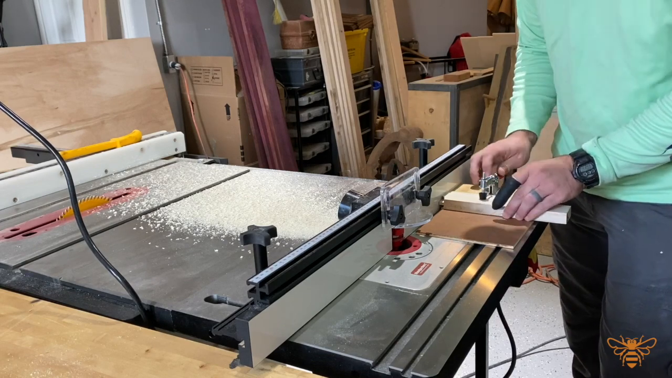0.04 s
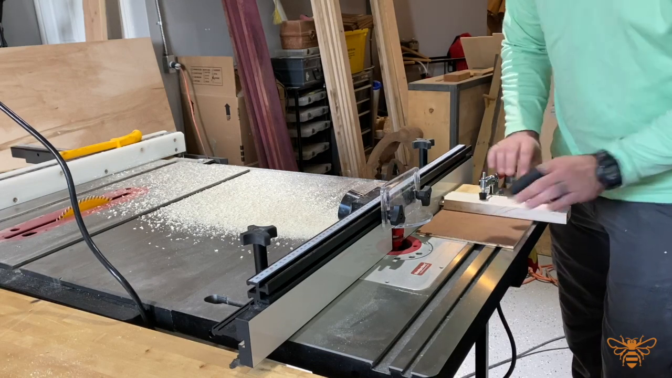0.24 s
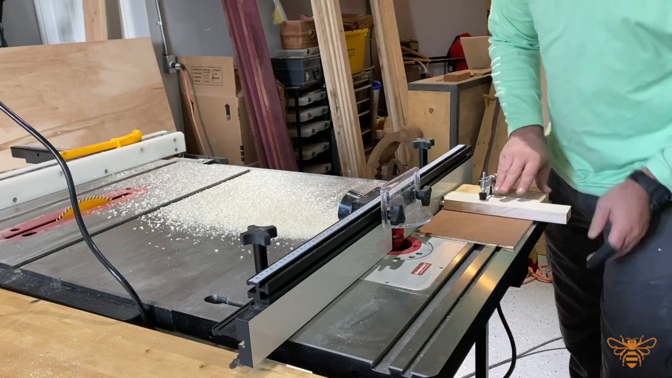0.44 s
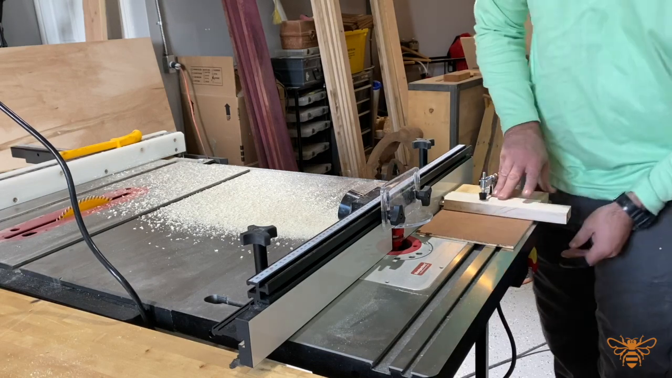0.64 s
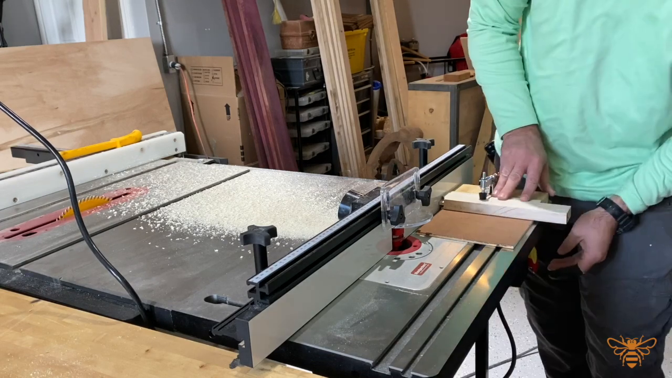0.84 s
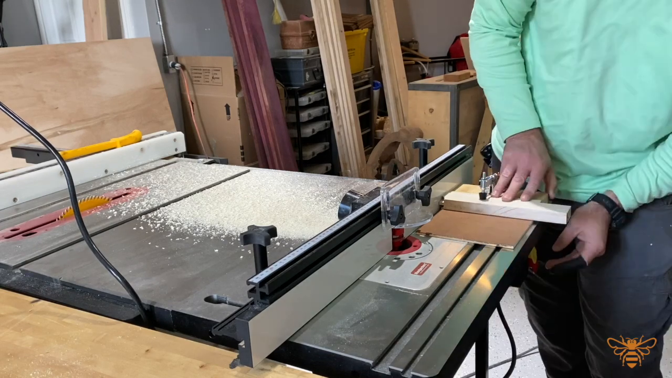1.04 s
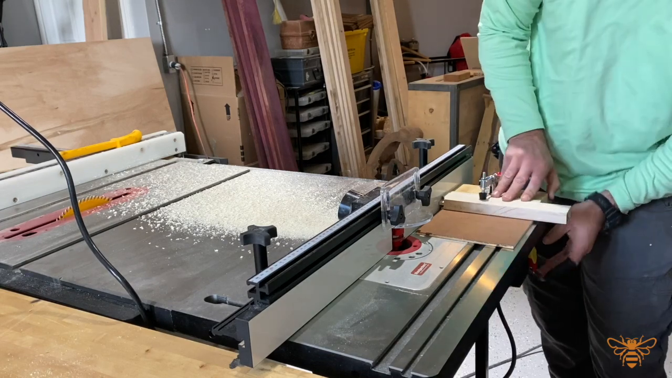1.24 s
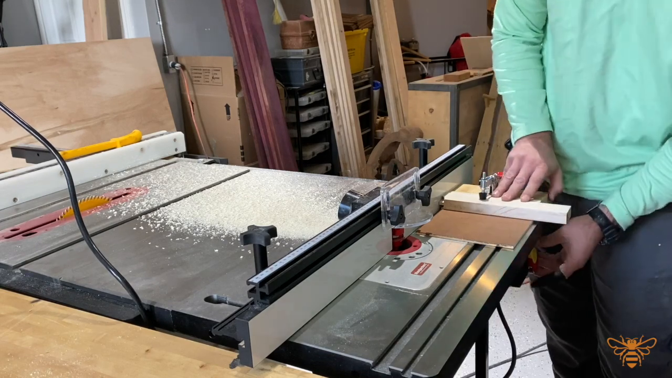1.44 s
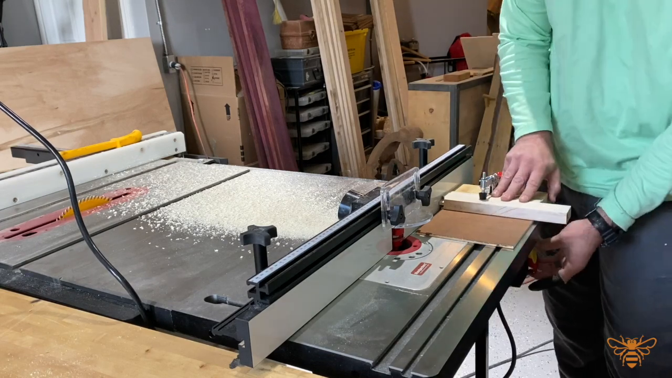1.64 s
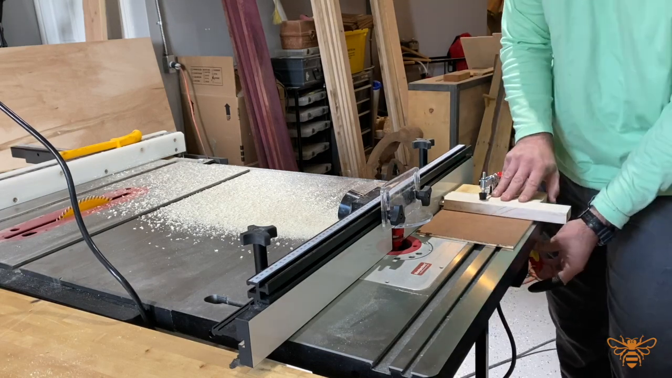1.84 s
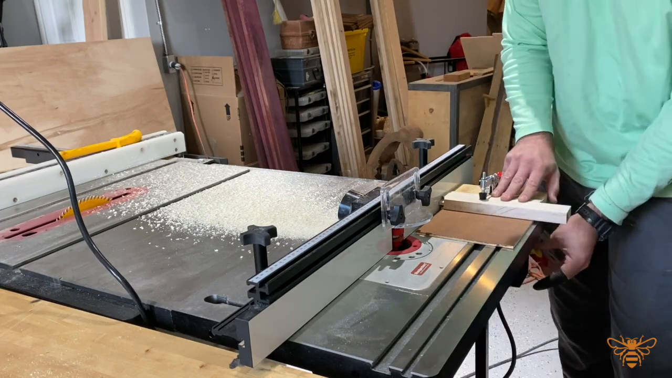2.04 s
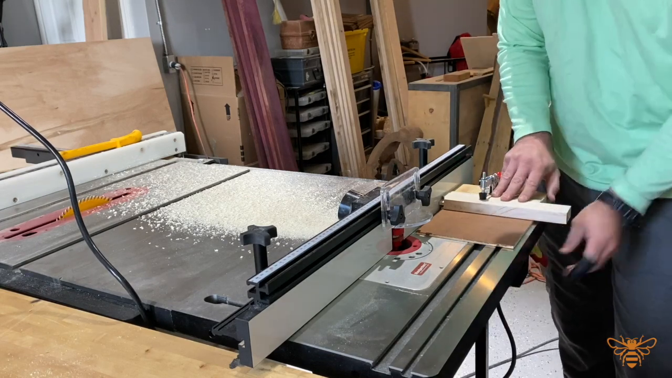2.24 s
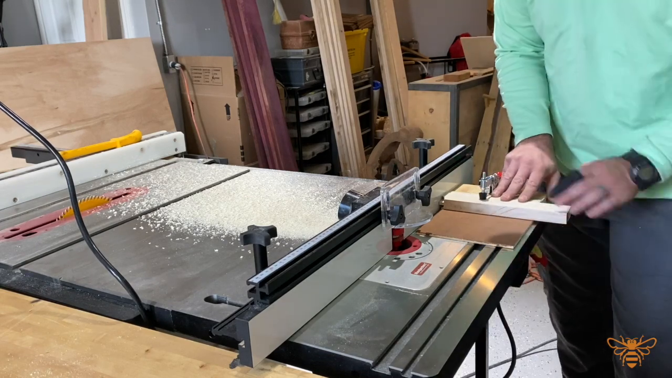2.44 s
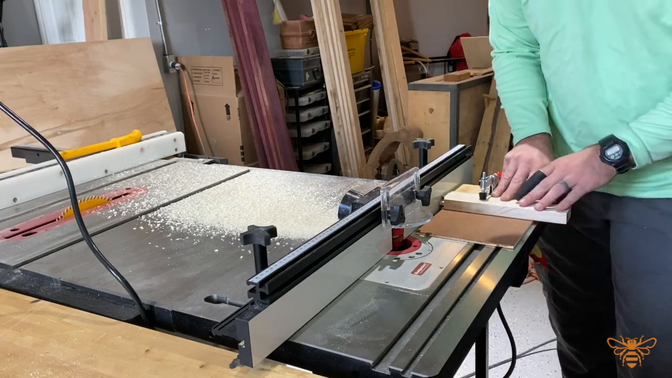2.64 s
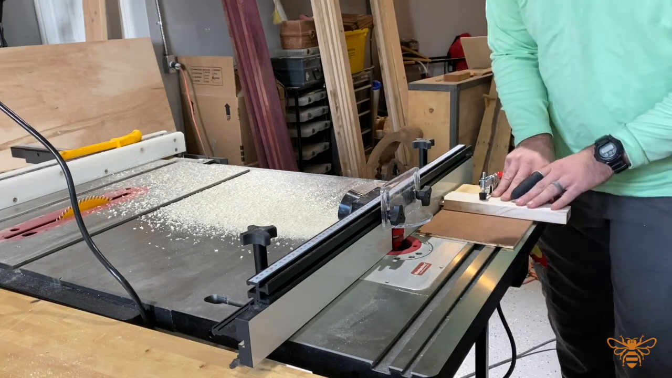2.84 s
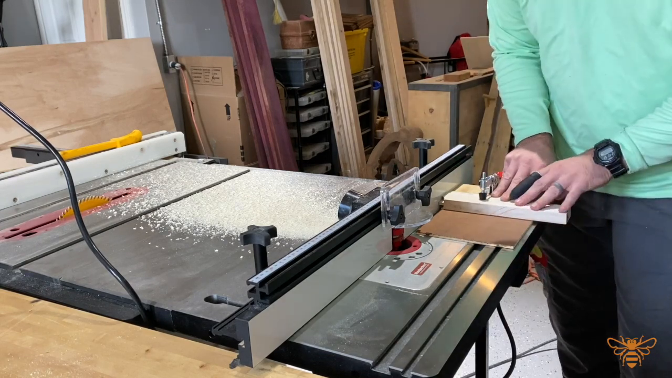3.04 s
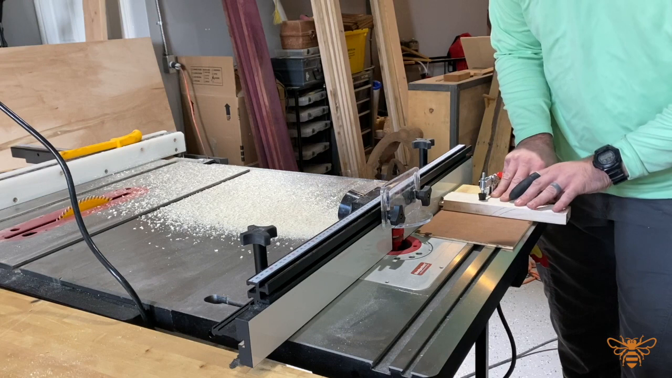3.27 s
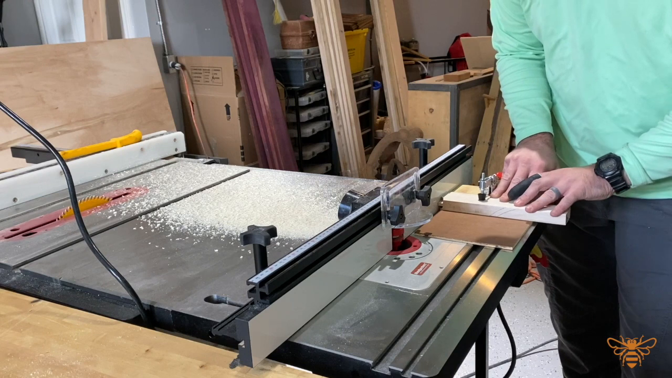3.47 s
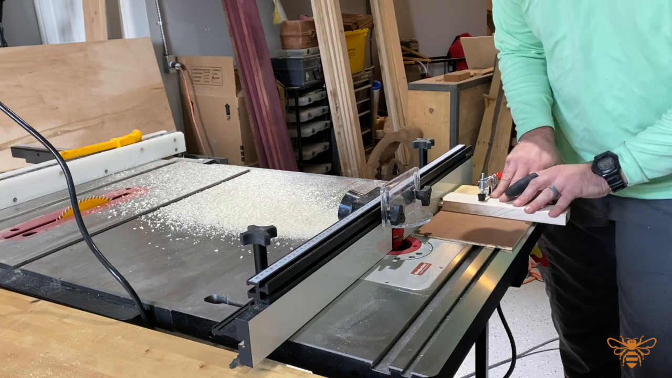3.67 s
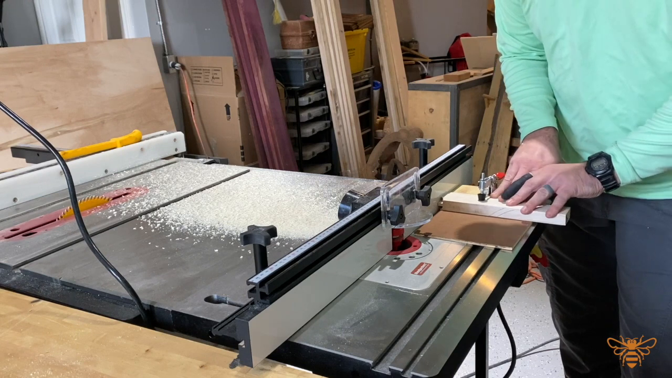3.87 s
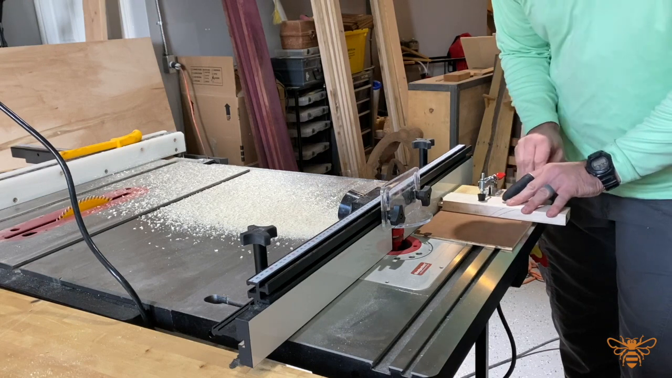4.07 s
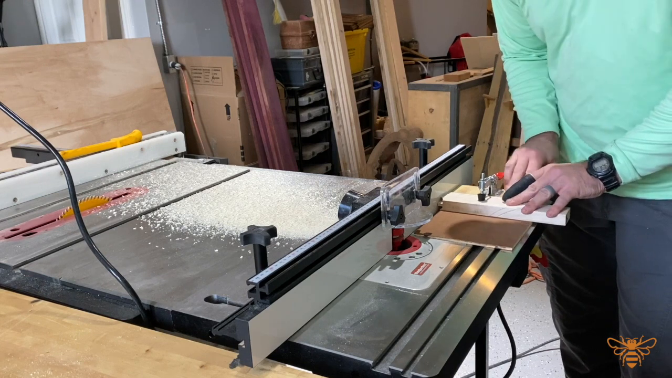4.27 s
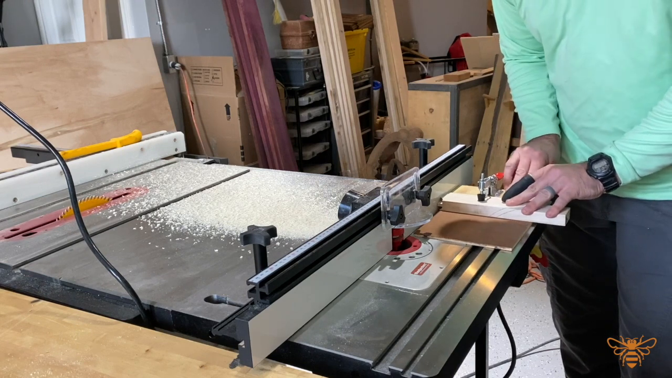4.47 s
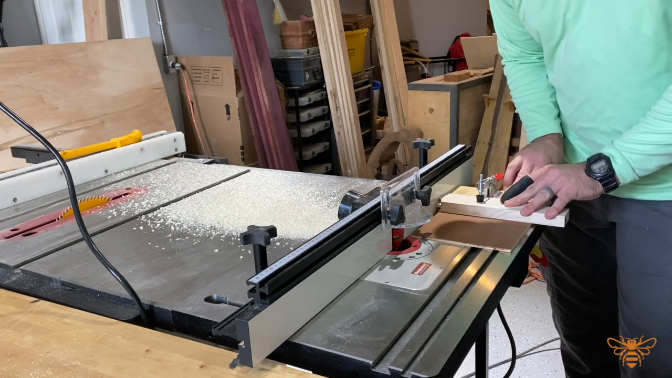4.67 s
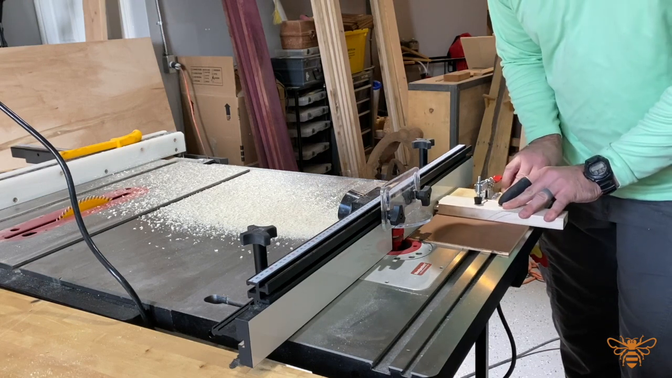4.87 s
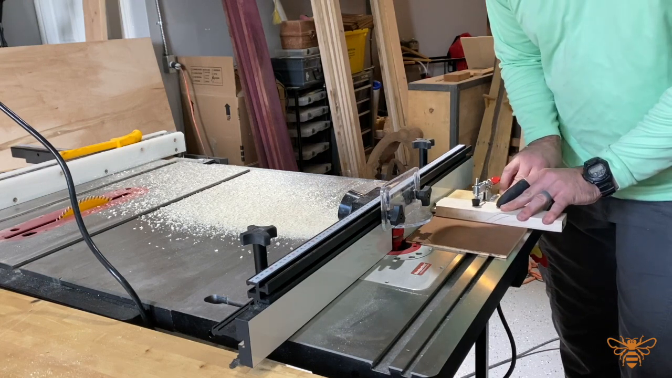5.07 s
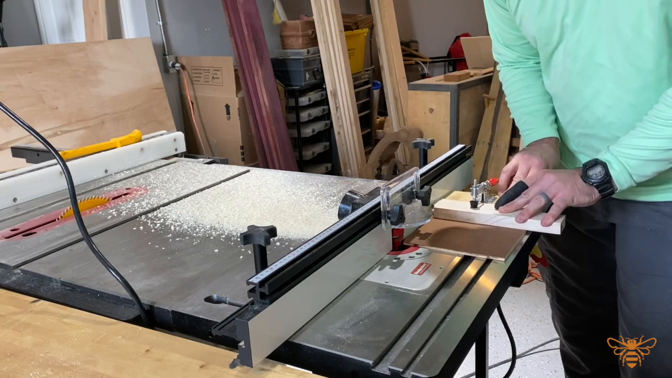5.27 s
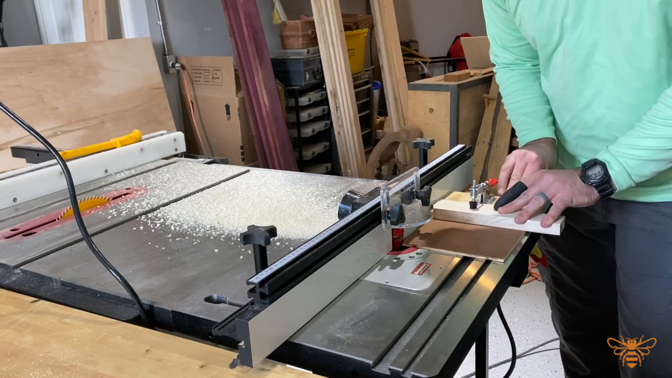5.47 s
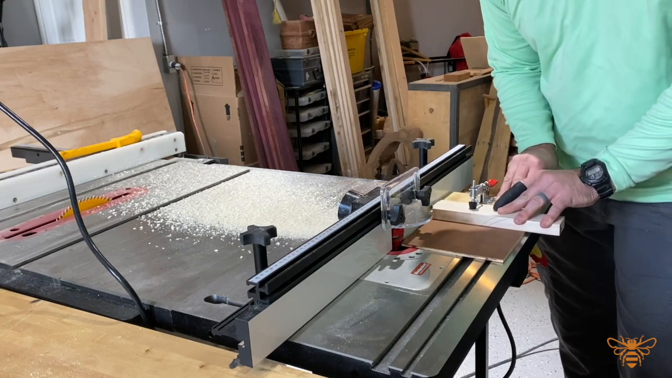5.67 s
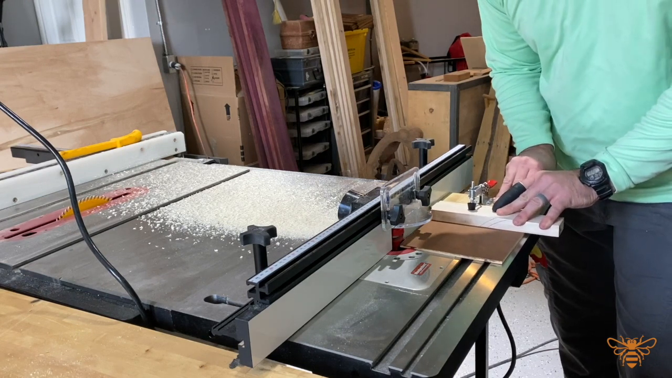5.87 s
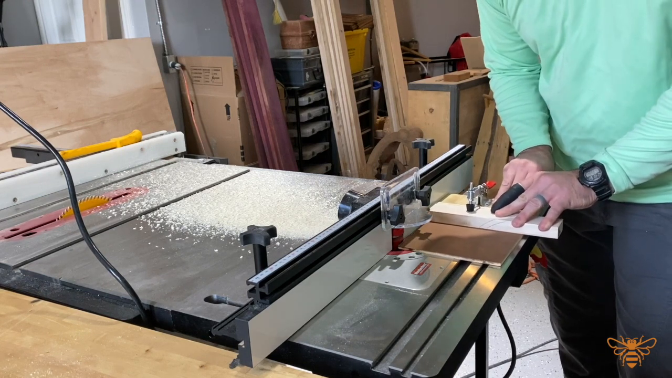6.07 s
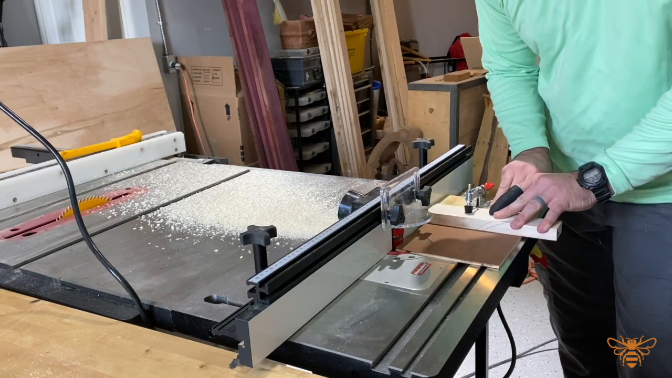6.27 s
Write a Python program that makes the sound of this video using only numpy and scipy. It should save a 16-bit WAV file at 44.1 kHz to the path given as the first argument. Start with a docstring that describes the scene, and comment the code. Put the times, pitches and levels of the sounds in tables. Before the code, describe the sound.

A quiet workshop hums low with a distant fan for about two seconds. A hard plastic switch cracks, with a brief bright whistling chirp, and a table-mounted router climbs rapidly in pitch to a piercing, many-toned whine with roaring, hissing air. It holds steady to the end. Close stereo camera microphone, lightly reverberant room; no cutting is heard.

```python
"""Workshop: a table-mounted router is switched on near a camera and spins up to a steady whine.
The whine is sines on the shaft orders; fan and brush noise grows with speed, the switch cracks and rings,
and the commutator bars whistle at the start. Mains hum, rumble and a far fan fill the room before it;
the camera's slow gain control turns them down under the motor."""
import sys
import numpy as np
from scipy import signal
from scipy.fft import rfft, irfft, next_fast_len
from scipy.io import wavfile
from scipy.ndimage import uniform_filter1d, map_coordinates

SR = 44100
rng = np.random.default_rng(int(sys.argv[2]) if len(sys.argv) > 2 else 0)


def persist_wave(psi):
    """Save psi, clipped to +-1, as 16-bit WAV."""
    counts = np.round(np.clip(psi, -1, 1) * 32767).astype(np.int16)
    wavfile.write(sys.argv[1], SR, np.atleast_2d(counts).T)


N = 278271

# lean_db is left minus right; likeness is left-right correlation; order is a multiple of shaft speed
# strong shaft orders, base: order, level_db at 0.4, 0.6 and 1.0 of full speed (3 columns), lean_db
STRONG_ORDERS = [(1.0, -49, -31.5, -27.5, 1.5), (2.0, -60, -41, -29, -4.5), (3.0, -47.5, -36.5, -19.5, 0.5),
                 (4.0, -52, -26, -25.5, -2.2)]
# usual phase lead of the left ear, one per strong order: lead_rad
STRONG_LEAD_RAD = [0.72, 0.66, 0.58, 0.16]
# clear upper orders, base: order, level_db at 0.4, 0.6 and 1.0 of full speed (3 columns), lean_db
CLEAR_ORDERS = [(5.0, -48, -39, -35.5, 5.5), (6.0, -45, -43.5, -27, -1), (7.0, -78, -40.5, -39.5, -0.5),
                (8.0, -81, -31.5, -35, 2), (10.0, -68, -43, -40.5, 1.5), (12.0, -52, -46.5, -38.5, 6.5),
                (17.0, -66, -60, -33.5, 0)]
# faint orders, base: order, level_db at 0.55, 0.9 and 0.99 of full speed (3 columns)
FAINT_ORDERS = [(9, -39, -43, -45), (11, -56, -37, -43), (13, -54, -42, -56), (14, -50, -45, -41.5),
                (16, -56, -48, -42.5), (18, -47, -50, -43)]
# resonances and standing waves that the strong and clear orders slide over: pitch_hz, spread_hz, gain_db, lean_db
STANDING_WAVES = [(289, 8.7, -12, 4), (320, 4, -4, -6), (362, 4.4, 3.5, 7), (378, 2.7, -5, -13),
                  (408.5, 1.7, -7, 15), (419, 3.7, 4, 10), (417, 0.53, -2, -7), (435.6, 3.6, -5, 11),
                  (433, 1.4, -5, 8), (442.9, 3.93, 11, -2), (447.6, 2.2, -1.5, 13.5), (548, 12.5, 15, 3),
                  (620, 11, -6, -1), (713, 52, 9, 1), (767, 18, 2, 0), (790, 9, -2, 2),
                  (857, 10.1, 12, 3.5), (891.5, 3.3, 7, 5.5), (1040, 13, -7, 0), (1052, 87, -9, 2),
                  (1223, 6.1, 4.5, 0), (1262, 9.3, 4, 2), (1323, 0.74, -10, -1), (1335, 13.3, -7, -4),
                  (1550, 66, 4.5, -1.5), (1710, 57, 8.5, -2), (1756, 2, 4, 0), (1766, 3.8, 4, 1),
                  (1778.8, 1.07, -14, -16), (1788.1, 1.1, -9.5, 12), (1867, 21, 8, -4), (2083, 24, -10, -2),
                  (2480, 18, -5, 0), (2230, 3.2, -4.5, 2), (2232.1, 6.1, 12, -10.5),
                  (2303, 49.5, -10.5, -1), (2636, 68, -5, 3.5), (2677, 4.4, 4, -3.5),
                  (2684.4, 0.49, -16, -2), (3122, 1.1, -2, -5), (3250, 51, -3, -2), (3574.8, 3.3, 5.5, -2),
                  (4244, 110, 9, -3), (4450, 47, 6.5, 1), (5355, 2.4, 8, -4), (5367, 1.3, 2.5, 5),
                  (6280, 150, 11, -2), (6810, 73, 7, -5), (7611.9, 32, -6, 5)]
# whine surges and dips as it climbs: centre_s, spread_s, gain_db
SURGES = [(2.195, 0.031, 5.5), (2.33, 0.0081, 4), (2.45, 0.043, -2), (2.975, 0.0099, 2)]
# passing swells and fades of single orders: order, centre_s, spread_s, gain_db
SWELLS = [(1, 2.205, 0.016, -3), (1, 2.29, .008, -10), (1, 2.375, .01, -8), (1, 2.32, .015, -1),
          (1, 2.43, 0.017, 3), (1, 2.49, .012, -10), (1, 2.68, 0.015, -4), (1, 2.98, 0.029, -1.5),
          (1, 3.275, .026, -12), (1, 3.755, 0.024, -13), (1, 3.5, .04, 2.5), (2, 2.19, .012, -8),
          (2, 2.34, .01, 3), (2, 2.255, .01, 2.5), (2, 2.28, .012, -5), (2, 3.19, 0.018, -6),
          (2, 4.22, 0.22, -2), (2, 4.17, .03, -12), (2, 2.52, .1, -2), (3, 2.21, .01, 5),
          (3, 2.235, 0.011, -11), (3, 2.27, .012, -2.5), (3, 2.465, .025, -8), (3, 2.57, .04, -8),
          (3, 2.93, 0.07, 2), (3, 3.22, 0.11, -3), (3, 4.27, 0.048, -8.5), (4, 2.235, .015, 6.5),
          (4, 2.29, .012, -11), (4, 3.94, 0.06, -8.5), (4, 4.52, .06, 4), (4, 6.26, 0.23, 2),
          (5, 2.235, .01, -4), (5, 2.33, .01, -2), (5, 2.44, 0.019, -13), (5, 4.06, .025, -14),
          (5, 4.22, .04, -12), (5, 5.0, 0.29, 1.5), (5, 2.76, .04, -9), (5, 5.75, .4, -1),
          (6, 2.13, 0.018, 2), (6, 2.21, 0.027, -8), (6, 2.27, .01, 3), (6, 2.31, 0.01, 7),
          (6, 2.41, .012, 3), (6, 2.485, 0.018, 12), (6, 3.77, 0.021, -12), (6, 3.33, 0.04, -10),
          (6, 3.9, 0.073, 3.5), (6, 3.62, 0.024, -12), (6, 5.05, 0.22, -0.5), (6, 4.19, .05, -10),
          (6, 5.6, .15, -10), (7, 2.25, .025, 9.5), (7, 2.31, .01, 8), (7, 2.35, .012, -12),
          (7, 2.75, .2, -4), (7, 3.94, 0.28, 4.5), (7, 4.85, .15, 7), (7, 5.26, 0.14, -19),
          (8, 2.23, 0.017, -8), (8, 2.2, .02, 3), (8, 3.07, 0.071, -7), (8, 3.58, 0.12, -7),
          (8, 2.6, .08, 4), (8, 3.97, 0.023, -14), (8, 4.47, 0.07, -10), (9, 2.85, 0.18, -10),
          (9, 4.1, 0.25, -8), (10, 2.21, .02, -5), (10, 2.29, .015, 5), (10, 3.3, 0.044, -4),
          (10, 3.75, 0.1, -6), (10, 4.03, 0.12, 4), (10, 6.35, .25, -5), (11, 2.92, .15, -6),
          (11, 3.95, .15, -11), (11, 4.7, .3, -7), (11, 5.85, .35, 5.5), (12, 3.8, 0.14, -5),
          (12, 4.28, .04, -12), (12, 4.85, .1, 2.5), (12, 5.1, .08, -12), (12, 6.1, .2, -8),
          (13, 4.6, .4, 7), (14, 4.7, .15, 6.5), (14, 5.6, 0.21, -9), (17, 3.87, 0.16, -3.5),
          (17, 4.95, .25, -5)]
# motor air, rows roar and hiss, base: full_speed_db, growth_db per doubling of speed,
# first_pull_cut_db (negative raises)
AIR = [(-21.5, 10, 5), (-21.5, 18.5, -8)]
# roar spectrum: pitch_hz, relative_db
ROAR_SHAPE = [(110, -12.5), (180, -14), (280, -16), (450, -12), (700, -5), (780, -4), (850, 0.5), (950, -5),
              (1200, -8), (1600, -4.5), (2200, -8), (3500, -34), (6000, -19.5)]
# hiss spectrum: pitch_hz, relative_db
HISS_SHAPE = [(1200, -70), (2500, -3), (3400, -6), (4400, -1.5), (5500, -5), (6500, -5.5), (8000, -8.5),
              (10000, -11), (11500, -17), (13000, -18.5), (15000, -17.5), (17500, -47)]
# standing waves that colour the roar: pitch_hz, gain_db
ROAR_BOOMS = [(566, 6), (632, 4), (675, 4), (706, 8), (810, -6), (833, 7), (920, 7), (945, 5), (988, 5),
              (1070, 4), (1221, 8), (1398, 3), (1600, 4), (1642, 6), (1690, -4)]
# bursts of noise as the motor starts: start_s, roar_db, hiss_db, t60_s
NOISE_BURSTS = [(2.0, -42, -36, 0.6), (2.12, -35, -30.5, 0.45)]
# commutator whistle ahead of the housing: time_s, peak_db
WHISTLE = [(2.042, -45), (2.0465, -15.5), (2.05, -22), (2.055, -33), (2.064, -34), (2.069, -22),
           (2.073, -33), (2.09, -31), (2.098, -33), (2.108, -38), (2.125, -29), (2.15, -48)]
# motor housing resonances: pitch_hz, width_hz, gain_db
HOUSING = [(2274, 38, 0), (2390, 160, -6.5), (3100, 190, -3), (4000, 150, -5), (4750, 40, 0)]
# switch contacts: start_s, relative_db, lean_db, ring_relative_db
CLICKS = [(1.997, -7, -1, 1.5), (2.0044, -42, -16, -5), (2.0462, -36, 5, 18), (2.1174, -32, -3, -8),
          (2.1225, -24, 5, -4)]
# plastic switch housing modes: pitch_hz, relative_db, t60_s
SWITCH_MODES = [(545, -10.5, .06), (1300, -12, 0.05), (1750, 2.5, 0.0095), (2260, 0.5, 0.014),
                (2900, 3.5, 0.0092), (5840, -6, 0.016), (7540, 0, 0.0084)]
# room decay: pitch_hz, t60_s
SHOP_DECAY = [(300, 0.99), (3000, 0.56), (12000, 0.016)]
# mains and other hum tones, base: pitch_hz, rms_db, unsteadiness_db
HUM = [(119.9, -41, .35), (359.7, -67, 1.5), (54.5, -52.5, 1.1), (60, -61, 1.5)]
# far fan blade tones, base: multiple of BLADE_HZ, rms_db
BLADES = [(1, -64), (2, -62), (3, -64), (5, -68), (6, -67), (8, -73), (9, -75), (10, -78), (11, -73),
          (13, -80), (14, -79)]
# rumble spectrum: pitch_hz, relative_db
RUMBLE_SHAPE = [(28, -17), (42, -10), (58, -5), (75, 4), (95, 0), (130, -4), (170, -3.5), (250, 0),
                (320, -9.5)]
# far fan noise spectrum: pitch_hz, relative_db
FAN_SHAPE = [(200, -29), (350, -2), (700, -7.5), (1000, -12), (1400, -12), (2400, -17), (5000, -19),
             (6500, -24.5), (9500, -30), (12500, -43), (14000, -42), (15000, -70)]
# motor noise: pitch_hz, likeness
NEAR_LIKENESS = [(200, 0.96), (1000, 0.4), (3000, 0.31), (6000, 0.25), (8000, 0.72), (10000, .9)]
# background noise: pitch_hz, likeness
FAR_LIKENESS = [(130, 0.94), (290, 0.3), (640, 0.12), (1400, .1), (7000, 0.13), (9500, .9)]

FULL_HZ, START_S = 447.7, 1.9627  # full shaft speed in turns/s
QUICK_S, SLOW_S, QUICK_SHARE = .1393, .5656, .4753  # time constants of the approach
PULL_S, PULL_HZ_PER_S = 1.98, 1480  # first pull limits the early speed
CATCH_S, CATCH_RISE_S = 2.086, 0.02  # motor catches; roar rises and hiss drops to their speed-set levels
LATE_S, LATE_FALL_DB_PER_S = 4, 0.75  # the camera's gain control eases the roar and hiss down slowly from 4 s on
BUILD_S = 0.0096  # a tone gliding past quicker than this hardly stirs a narrow standing wave
SHAKE_DB, SHAKE_S, SHAKE_KNOTS_PER_S = 1.8, .6, 70  # order flutter, fading after the catch
TREMBLE_DB, TREMBLE_KNOTS_PER_S = .8, 40  # lasting tremble of the strong orders
BOOM_SPREAD_HZ = 5
BLADE_HZ = 85
OFFSET_HZ, OFFSET_S = 6800, .00029  # treble phase offset between left and right: onset, slope as a delay
TOP_HZ = 15800
GAIN_THRESHOLD_DB, GAIN_MEMORY_S = -37.5, 1.2
SIDES = np.array([[.5], [-.5]])  # left, right


def amp(db):
    """Gain of a level in dB."""
    return 10 ** (np.asarray(db) / 20)


def unit(x):
    """x at rms 1."""
    return x / np.sqrt(np.mean(x ** 2) + 1e-20)


def along(points, hz):
    """(Hz, value) points interpolated on a log axis."""
    point_hz, value = np.transpose(points)
    return np.interp(np.log(hz + 1), np.log(point_hz + 1), value)


def bump(x, centre, spread):
    """Gaussian bump of height 1."""
    return np.exp(-((x - centre) / spread) ** 2 / 2)


def wander(place):
    """Smooth random function, one knot per whole step of place."""
    knots = rng.standard_normal(int(place.max()) + 4)
    return map_coordinates(knots, [place[::32]]).repeat(32)[:N]


def filtered(x, response):
    """x times a response of frequency."""
    m = next_fast_len(N + SR // 2)
    return irfft(rfft(x, m) * response(np.fft.rfftfreq(m, 1 / SR)), m)[..., :N]


def rush(spectrum, likeness, patchy_db, gate=1):
    """Stereo noise of rms 1, patchy in time and pitch; mid and side shares set the likeness."""
    z = signal.stft(rng.standard_normal((2, N)), nperseg=512)[2]
    field = uniform_filter1d(rng.standard_normal(z.shape[1:]), size=5, axis=0)
    field = uniform_filter1d(field, size=10, axis=1)
    pair = gate * signal.istft(z * amp(patchy_db * unit(field)), nperseg=512)[1][:, :N]
    shape = [(1, -120), *spectrum, (SR / 2, -120)]

    def mid_side(hz):
        turn = np.arccos(np.clip(along(likeness, hz), -1, 1)) / 2
        return amp(along(shape, hz)) * [np.cos(turn), np.sin(turn)]

    mid, side = filtered(pair, mid_side)
    return unit(np.array([mid + side, mid - side]))


def shaft():
    """Speed (turns/s) and angle (rad): two exponential approaches, capped by the first pull."""
    t = np.arange(N) / SR
    u = np.maximum(t - START_S, 0)
    shortfall = QUICK_SHARE * np.exp(-u / QUICK_S) + (1 - QUICK_SHARE) * np.exp(-u / SLOW_S)
    pull = PULL_HZ_PER_S * np.maximum(t - PULL_S, 0)
    speed = np.minimum(FULL_HZ * (1 - shortfall), pull)
    return speed, 2 * np.pi * np.cumsum(speed) / SR


def whine(speed, angle):
    """Sines on the shaft orders; the room gives each ear its own level and phase per frequency."""
    out, t = np.zeros((2, N)), np.arange(N) / SR
    share = speed / FULL_HZ
    for (k, *row), usual_lead in zip(STRONG_ORDERS, STRONG_LEAD_RAD):
        db, lean_db = order(speed, k, *row)
        db = db + swell(k)
        db = db + 1.0 * wander(k * speed / 9)  # finer standing waves
        db = db + TREMBLE_DB * wander(TREMBLE_KNOTS_PER_S * t)
        lead = usual_lead + 0.2 * wander(k * speed / 12)
        level = amp(db + lean_db * SIDES) / np.cosh(lean_db * np.log(10) / 20) ** .5  # lean keeps the power
        out += level * np.sin(k * angle + lead * SIDES)

    shudder_rad = np.interp(share, [.6, 1], [.09, .012])
    angle = angle + shudder_rad * wander(90.0 * t)
    late_db = np.interp(share, [.35, .75], [16, 0])  # faint orders need speed to emerge
    faint = [(k, np.interp(share, [.55, .9, .99], db) - late_db, 0, 3.0) for k, *db in FAINT_ORDERS]
    clear_ripple_db = np.interp(share, [.8, .9, .99, .997], [2, 3, 2.5, .8])
    clear = [(k, *order(speed, k, *row), clear_ripple_db) for k, *row in CLEAR_ORDERS]
    for k, db, lean_db, ripple_db in clear + faint:
        # a gliding tone crosses standing waves: level, lean, phase
        level_ripple, lean_ripple, phase_ripple = [wander(k * speed / 18) for _ in range(3)]
        db = db + swell(k) + 0.61 * wander(2.5 * t)  # slow waver
        level = amp(db + ripple_db * level_ripple + (lean_db + ripple_db * lean_ripple) * SIDES)
        out += level * np.sin(k * angle + rng.uniform(0, 2 * np.pi) + .55 * phase_ripple * SIDES)

    wake = np.clip(speed / 170, 0, 1) ** 3  # orders rise out of silence with speed
    surge_db = sum(db * bump(t, s, spread) for s, spread, db in SURGES)
    direct = np.sqrt(2) * wake * amp(surge_db) * out
    echo_gain = np.interp(share, [.6, .9, 1], [.15, .17, .03])  # echo stands apart while the pitch moves
    return direct + shop(direct * echo_gain)


def order(speed, k, low_db, middle_db, full_db, lean_db):
    """Level and lean (dB) of one order: set by speed, plus the standing waves at its frequency."""
    step = 128
    wave_hz, spread_hz, gain_db, wave_lean_db = np.transpose(STANDING_WAVES)
    pitch_hz = k * speed[::step, None]
    glide_hz_per_s = np.gradient(pitch_hz, step / SR, axis=0)
    near = bump(pitch_hz, wave_hz, spread_hz) / np.hypot(1, glide_hz_per_s * BUILD_S / spread_hz)
    own_db = np.interp(speed / FULL_HZ, [.4, .6, 1], [low_db, middle_db, full_db])

    def smooth(v):
        return np.interp(np.arange(N), np.arange(0, N, step), v)

    return own_db + smooth(near @ gain_db), lean_db + smooth(near @ wave_lean_db)


def swell(k):
    """Passing gains (dB) of order k, plus its flutter while the motor lurches up."""
    t = np.arange(N) / SR
    coarse = t[::64]
    db = sum(db * bump(coarse, s, spread) for m, s, spread, db in SWELLS if m == k) + 0 * coarse
    fade = np.exp(-np.maximum(t - CATCH_S, 0) / SHAKE_S)
    return np.interp(t, coarse, db) + SHAKE_DB * fade * wander(SHAKE_KNOTS_PER_S * t)


def air(speed, angle):
    """Fan and brush noise: grows with speed, pulses a little once a turn."""
    t = np.arange(N) / SR
    full_db, growth_db, first_pull_cut_db = np.transpose(AIR)[..., None]
    pulling = np.exp(-np.maximum(t - CATCH_S, 0) / CATCH_RISE_S)
    db = full_db + growth_db * np.log2(speed / FULL_HZ + 1e-3) - first_pull_cut_db * pulling
    level = amp(db - LATE_FALL_DB_PER_S * np.maximum(t - LATE_S, 0))
    for s, *spit_db, t60 in NOISE_BURSTS:
        spit = (t > s) * amp(np.array(spit_db)[:, None] - 60 * np.maximum(t - s, 0) / t60)
        level = np.hypot(level, spit)

    def booms(f):
        return amp(sum(db * bump(f, hz, BOOM_SPREAD_HZ) for hz, db in ROAR_BOOMS))

    roar = rush(ROAR_SHAPE, NEAR_LIKENESS, patchy_db=1.5, gate=1 + 0.039 * np.cos(angle))
    roar = unit(filtered(roar, booms))
    hiss = rush(HISS_SHAPE, NEAR_LIKENESS, patchy_db=2.0, gate=1 + 0.13 * np.cos(angle))
    return (speed > 0) * (level[0] * roar + level[1] * hiss)


def whistle(speed, angle):
    """The 24 commutator bars sweep up through the housing's resonances, which ring on."""
    level = amp(np.interp(np.arange(N) / SR, *np.transpose(WHISTLE)))
    bars = level * (speed > 0) * (speed < 260) * np.sin(24 * angle)

    def modes(f):
        return sum(amp(db) * 1j * f * w / (c * c - f * f + 1j * f * w) for c, w, db in HOUSING)

    return np.tile(filtered(bars, modes), (2, 1))


def switch():
    """Each contact makes a short bright crack and rings the plastic housing as decaying sines."""
    out, t = np.zeros((2, N + SR)), np.arange(SR // 4) / SR
    for s, db, lean_db, ring_db in CLICKS:
        ring = 0
        for hz, mode_db, t60 in SWITCH_MODES:
            level = amp(mode_db + rng.normal(0, 1.4) - 60 * t / t60)
            ring = ring + level * np.sin(2 * np.pi * (hz * t + rng.random()))
        ring = ring * (1 - np.exp(-t / 0.00032))
        crack = np.diff(rng.standard_normal(len(t) + 1))  # differencing brightens it
        crack = crack * amp(-60 * t / 0.0065) * (1 - np.exp(-t / 0.00056))
        first = round(s * SR)
        click = 0.52 * crack + amp(ring_db - 15.5) * ring
        out[:, first:first + len(t)] += amp(db + lean_db * SIDES) * click
    return out[:, :N]


def shop(x):
    """Room echo: noise tail whose frequencies each die at their own speed."""
    hz, t, z = signal.stft(rng.standard_normal((2, SR // 2)), SR, nperseg=256)
    decay = amp(-60 * t / along(SHOP_DECAY, hz)[:, None])
    tail = signal.istft(z * decay, SR, nperseg=256)[1]
    late = np.pad(x, ((0, 0), (200, 0)))  # delay in samples
    return signal.fftconvolve(late, tail / np.linalg.norm(tail[0]), axes=1)[:, :N]


def background():
    """Unsteady mains hum and fan blade tones as wavering sines, over low rumble and far fan noise."""
    t = np.arange(N) / SR
    hum = 0
    for hz, db, sway_db in list(HUM) + [(k * BLADE_HZ, db, 2.5) for k, db in BLADES]:
        level = np.sqrt(2) * amp(db + sway_db * wander(6.86 * t))
        hum = hum + level * np.sin(2 * np.pi * hz * t + 0.36 * sway_db * wander(6.12 * t))
    rumble = amp(-50.5) * rush(RUMBLE_SHAPE, FAR_LIKENESS, patchy_db=1.5)
    fan = amp(-53.5) * rush(FAN_SHAPE, FAR_LIKENESS, patchy_db=1.7)
    return hum + rumble + fan


def scene():
    """Motor, switch and whistle with their echo, and the room's own sound."""
    speed, angle = shaft()
    start = switch() + whistle(speed, angle)
    return whine(speed, angle) + air(speed, angle) + start + amp(-4) * shop(start) + background()


def record(dry):
    """Treble phase offset between left and right, slow gain control, band limit."""
    def treble_offset(hz):
        return np.exp(2j * np.pi * OFFSET_S * np.maximum(hz - OFFSET_HZ, 0) * SIDES)

    x = filtered(dry, treble_offset)
    power = uniform_filter1d(np.mean(x ** 2, axis=0), size=4410)
    level_db = 10 * np.log10(np.abs(power) + 1e-12)
    over_db = np.maximum(level_db - GAIN_THRESHOLD_DB, 0)
    memory = round(GAIN_MEMORY_S * SR)
    cut_db = 0.5 * signal.fftconvolve(over_db, np.ones(memory) / memory)[:N]  # half the mean past excess
    return filtered(x * amp(-cut_db), lambda hz: hz < TOP_HZ)


dry = scene()
out = record(dry)
persist_wave(out)
```